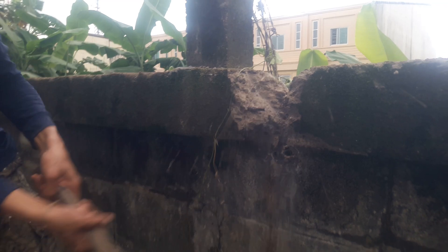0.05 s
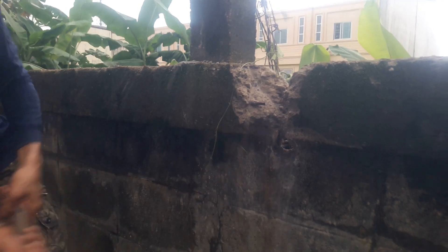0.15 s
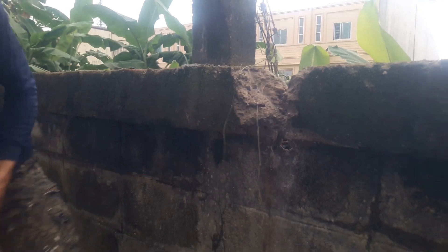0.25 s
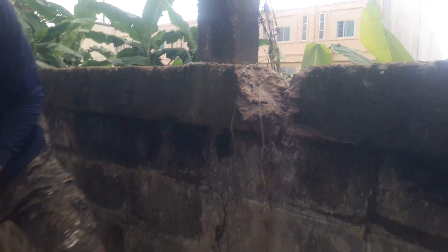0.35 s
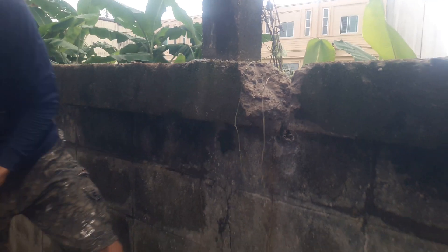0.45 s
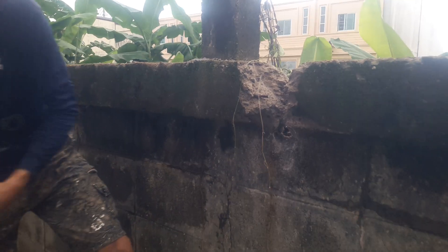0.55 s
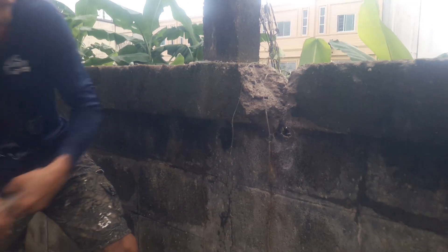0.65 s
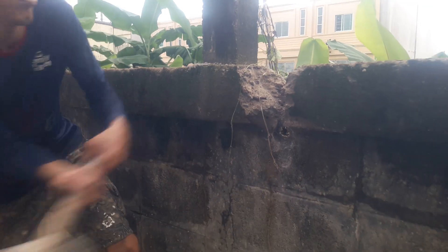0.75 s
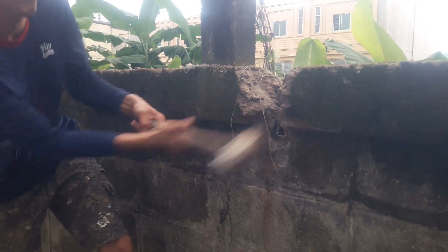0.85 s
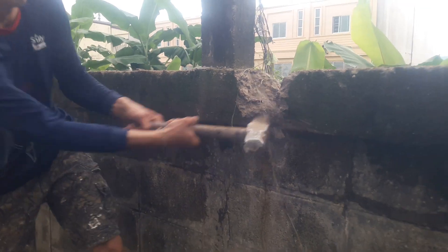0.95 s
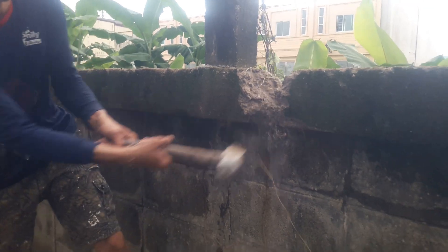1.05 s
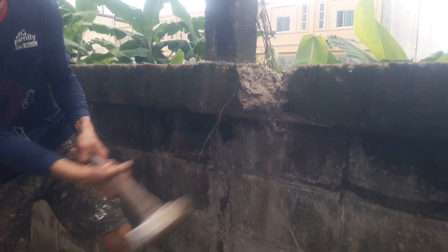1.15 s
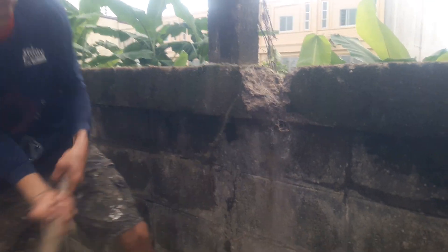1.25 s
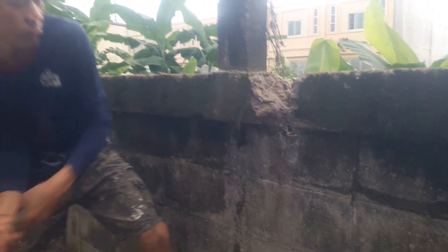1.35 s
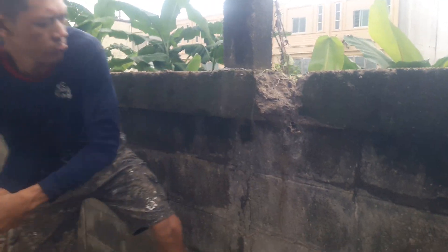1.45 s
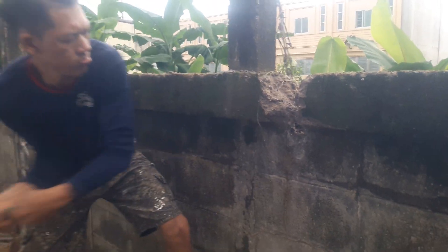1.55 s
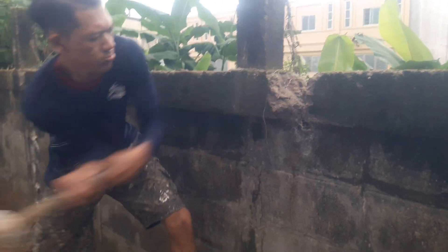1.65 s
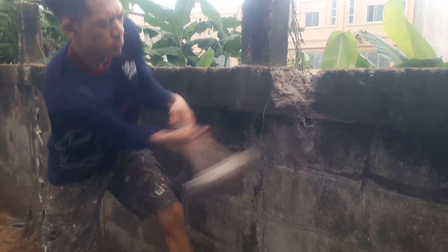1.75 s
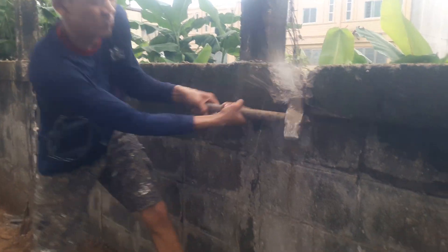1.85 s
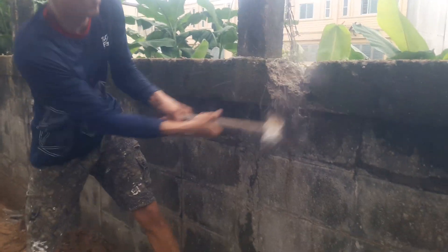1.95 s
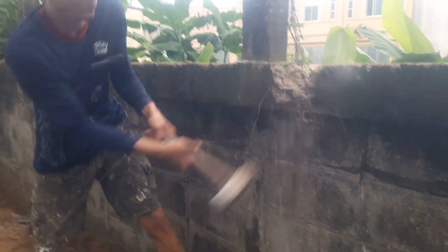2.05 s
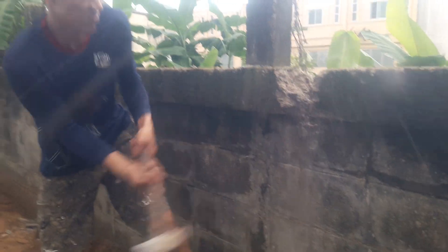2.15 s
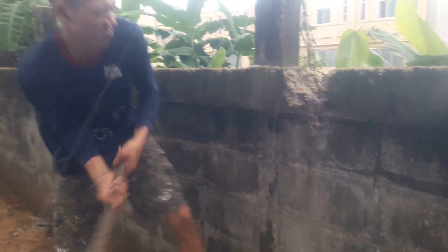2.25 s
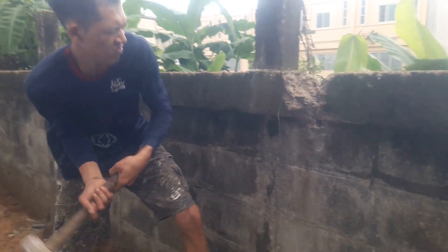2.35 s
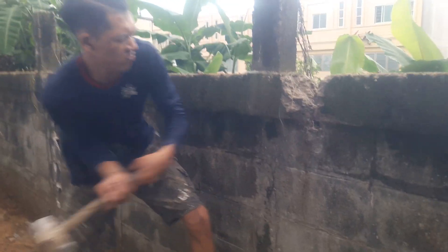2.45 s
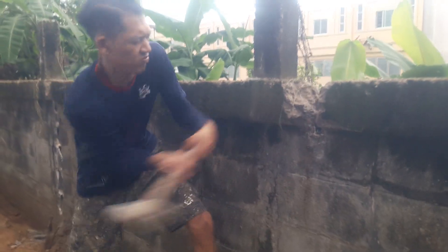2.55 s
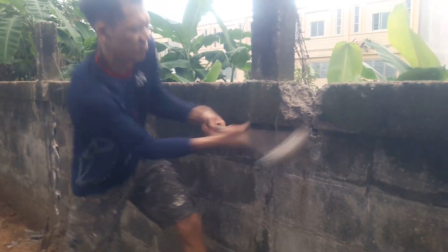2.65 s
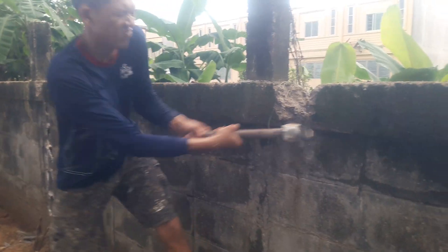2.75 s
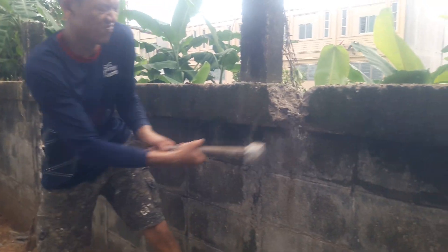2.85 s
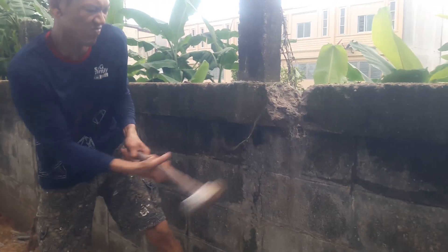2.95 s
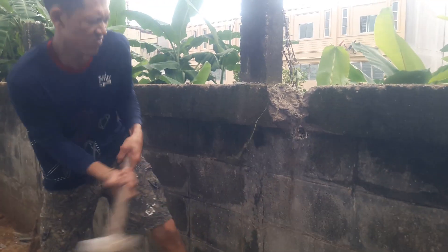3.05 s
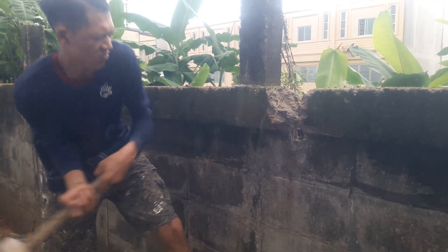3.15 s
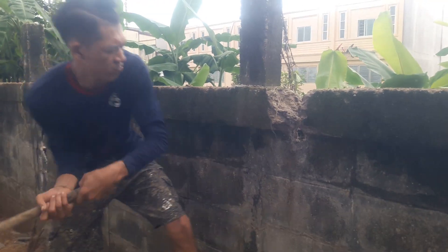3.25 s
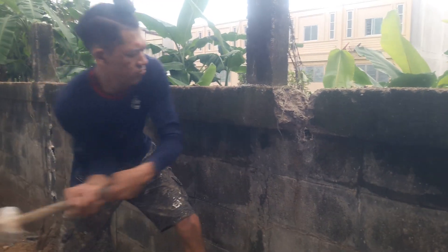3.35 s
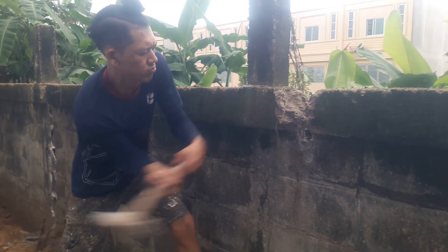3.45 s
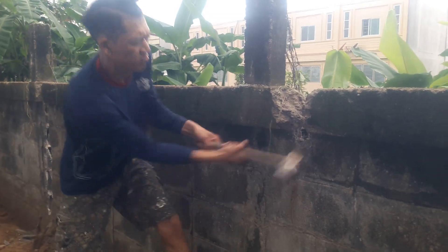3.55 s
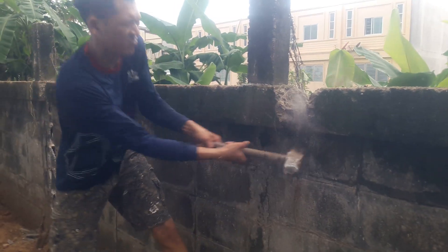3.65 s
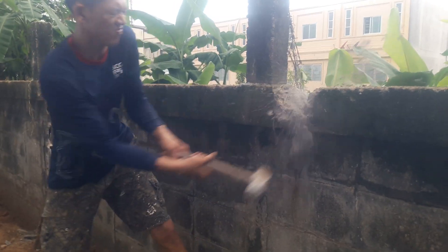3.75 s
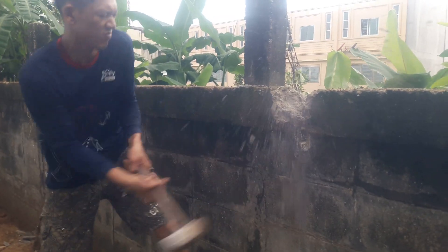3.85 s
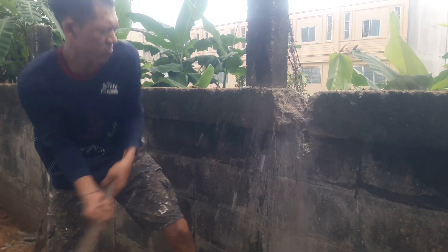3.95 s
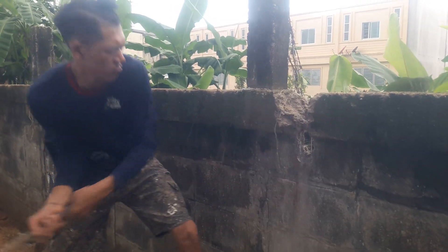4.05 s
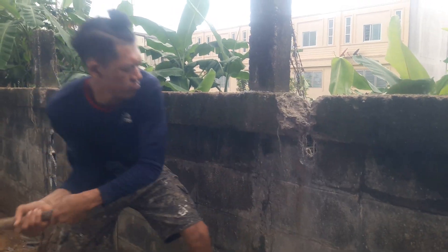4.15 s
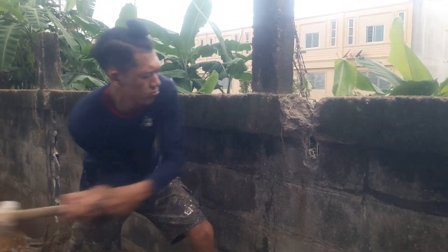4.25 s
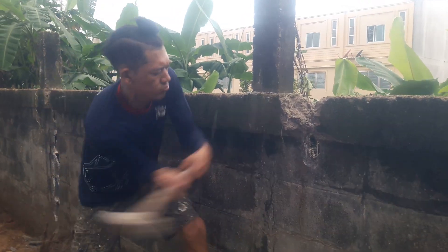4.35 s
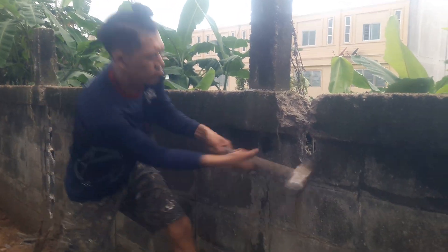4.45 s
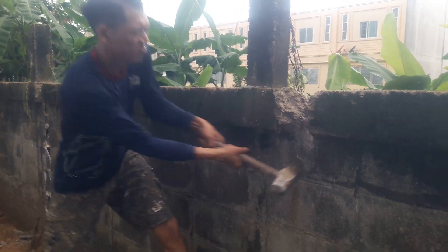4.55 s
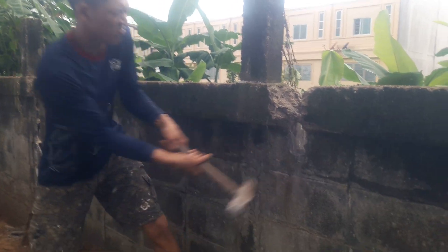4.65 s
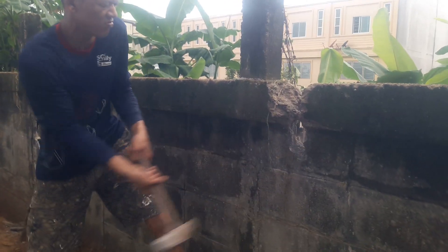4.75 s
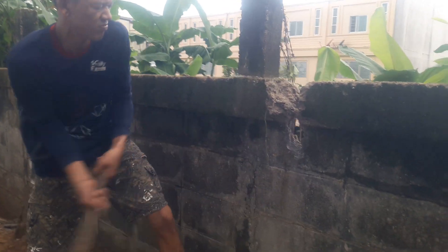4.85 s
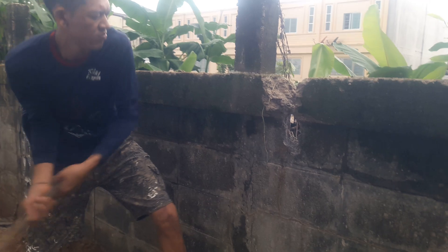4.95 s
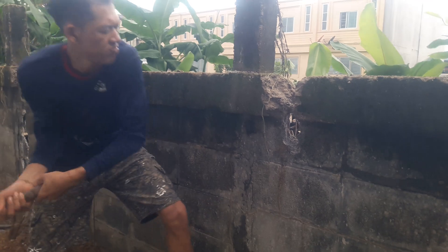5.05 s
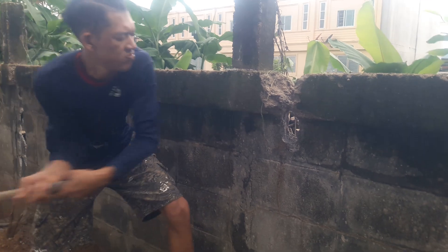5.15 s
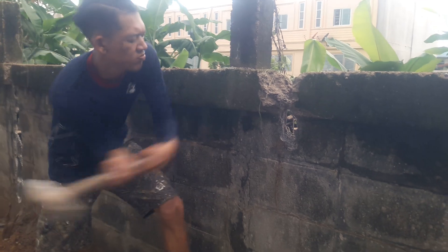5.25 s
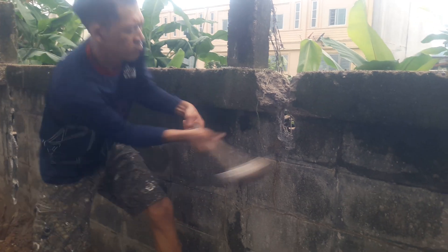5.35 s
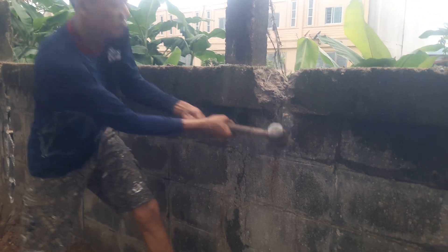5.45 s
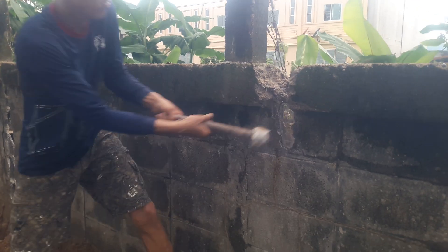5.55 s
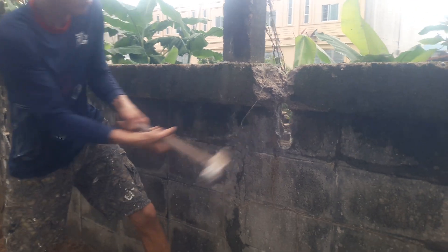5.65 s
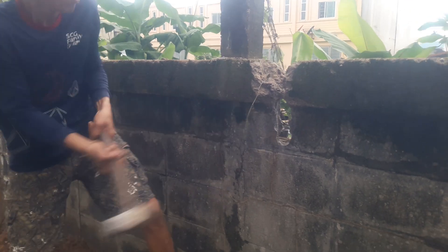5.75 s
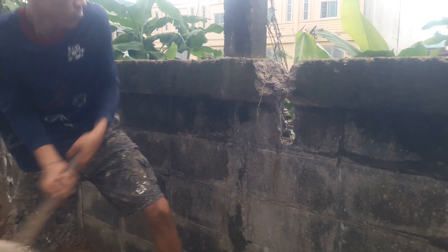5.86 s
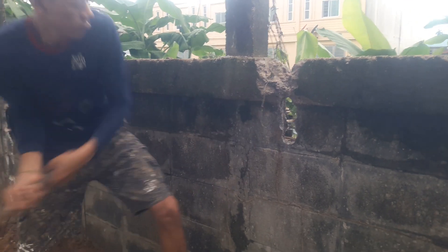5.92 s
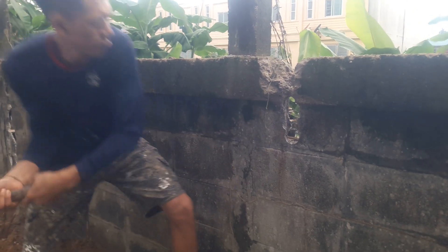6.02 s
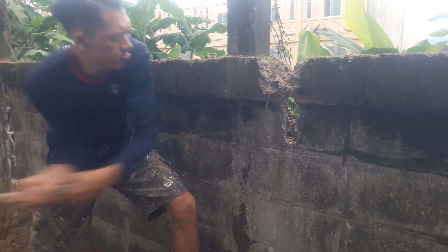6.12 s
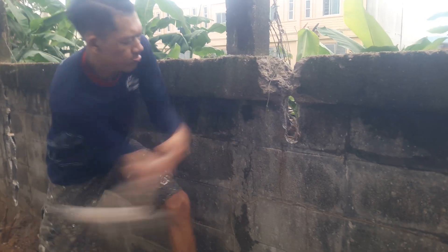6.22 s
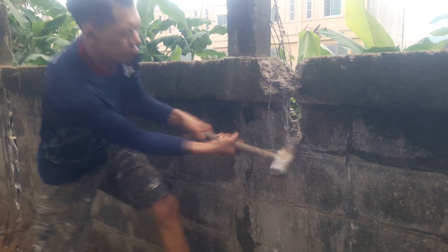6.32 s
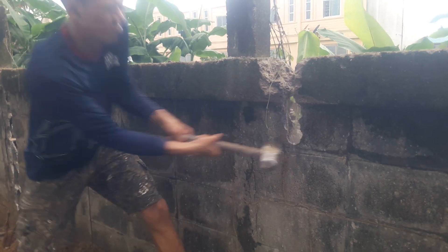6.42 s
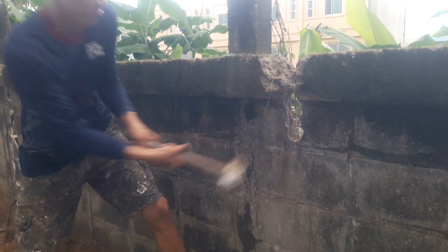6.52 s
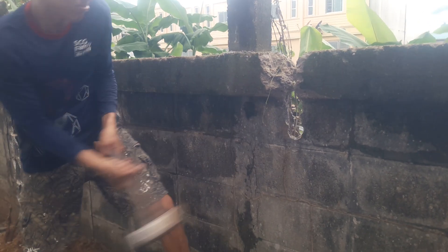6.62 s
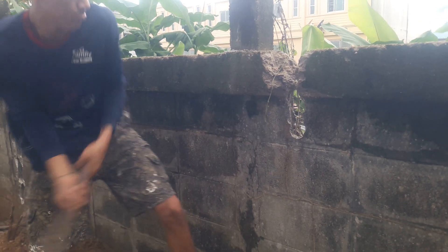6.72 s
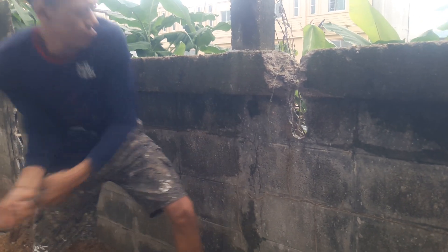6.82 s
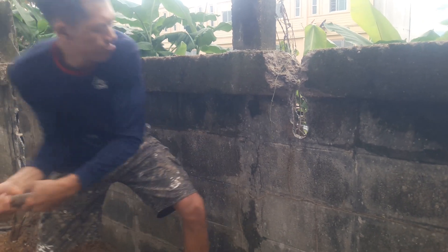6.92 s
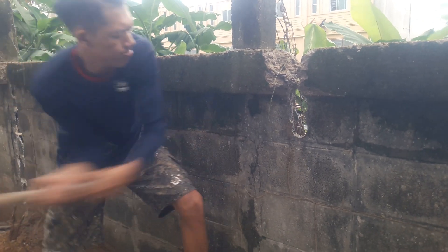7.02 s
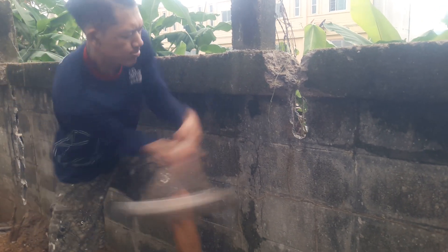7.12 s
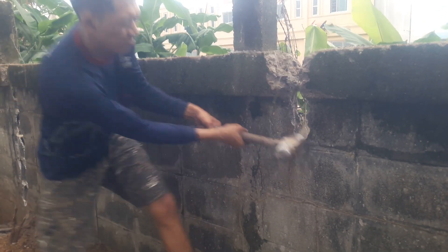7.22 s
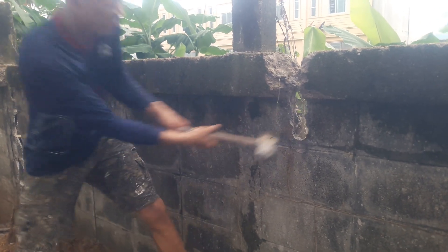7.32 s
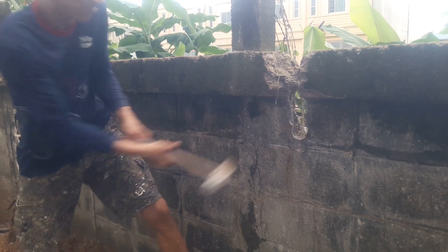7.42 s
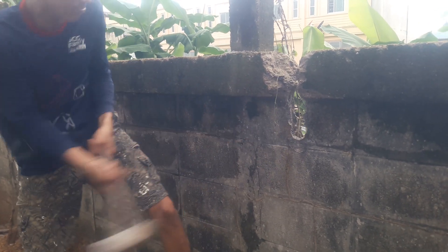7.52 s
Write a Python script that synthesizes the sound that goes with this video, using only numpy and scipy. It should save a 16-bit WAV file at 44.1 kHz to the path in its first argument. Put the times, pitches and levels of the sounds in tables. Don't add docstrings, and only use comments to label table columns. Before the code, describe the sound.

Outdoors in a narrow walled yard, a heavy steel hammer hits hollow concrete blocks eight times at a steady pace just under a second apart. Each blow is a hard knock with a thump, gritty crunch and faint steel ring, then quick wall slaps and a scattered tail. Chips clack, lumps thud and sand patters between blows. A distant motor drone fades behind. The microphone is close, thin in the bass, with flattened peaks.

```python
import sys
import numpy as np
from scipy import signal
from scipy.io import wavfile
from scipy.ndimage import uniform_filter1d

SR = 44100
rng = np.random.default_rng(int(sys.argv[2]) if len(sys.argv) > 2 else 0)


def to_linear_factor(level_db):
    exponent = np.asarray(level_db, float) / 20
    return 10 ** exponent


def int16_out(signal):
    q = np.round(np.clip(np.atleast_2d(signal).T, -1, 1) * 32767)
    wavfile.write(sys.argv[1], SR, q.astype(np.int16))


N = 334495
LEAD = SR // 5
TOTAL = N + LEAD


def clock():
    return (np.arange(TOTAL) - LEAD) / SR


def at_hz(points, hz, axis=1):
    return np.interp(np.log(hz), np.log(np.array(points)[:, 0]), np.array(points)[:, axis])


def rms_one(x):
    return x / np.sqrt(np.mean(x ** 2) + 1e-20)


def peak_one(x):
    return x / (np.max(np.abs(x)) + 1e-20)


def band(x, low_hz, high_hz):
    edges = [low_hz, min(high_hz, .45 * SR)]
    return signal.sosfilt(signal.butter(2, edges, "band", fs=SR, output="sos"), x)


def ring(clicks, hz, t60):
    r, w = to_linear_factor(-60 / (max(t60, .001) * SR)), 2 * np.pi * hz / SR
    return signal.lfilter([0, np.sin(w)], [1, -2 * r * np.cos(w), r * r], clicks + 1e-18)


def drift(rate):
    r = np.exp(-80 * np.pi * rate / SR)
    slow = signal.lfilter([1], [1, -2 * r, r * r], rng.standard_normal(TOTAL // 40 + 2002))[2000:]
    return np.interp(np.arange(TOTAL) / 40, np.arange(len(slow)), rms_one(slow))


def burst(size, decay_s, rise_s):
    t = np.arange(size) / SR
    clicks = rng.standard_normal(size) * to_linear_factor(7.0 * rng.exponential(1, size).clip(0, 4))
    return clicks * (1 - np.exp(-t / rise_s)) * np.exp(-t / decay_s)


def add(track, s, sound):
    at = LEAD + round(s * SR)
    track[at:at + len(sound)] += sound[:len(track) - at]


# time_s, level_db
MOTOR_LEVEL = [(0, -39.5), (.7, -42.5), (1.5, -51), (3.3, -44), (4.2, -50.5), (5.0, -53.5), (5.4, -59.5),
               (6.4, -56), (7.58, -67.5)]


def motor_level():
    s, db = np.transpose(MOTOR_LEVEL)
    return np.interp(clock(), s, db)


# pitch_hz, level_db
MOTOR_LINES = [(58, -22.5), (165, 1), (186, -1.5), (305, -1.5), (335, 8), (365, -9)]


def hum(drone_db):
    white = rng.standard_normal(TOTAL)
    lines = sum(to_linear_factor(db) * rms_one(ring(white, hz, 1.0)) for hz, db in MOTOR_LINES)
    return to_linear_factor(drone_db - 11) * rms_one(lines)


# start_s, pitch_hz, level_db, length_s
BIRD_NOTES = [(.865, 4800, -60, .06), (1.40, 4200, -68, .04), (3.34, 3600, -60, .05),
              (4.05, 5100, -62, .03), (6.938, 4800, -66, .05), (7.06, 2250, -68, .06)]


def peeps():
    out = np.zeros(TOTAL)
    for s, hz, db, length in BIRD_NOTES:
        t = np.arange(round(length * SR)) / SR
        swell = np.sqrt(np.sin(np.pi * t / length))
        add(out, s, to_linear_factor(db) * swell * np.sin(2 * np.pi * hz * t * (1 - 0.05 * t)))
    return out


# pitch_hz, level_db_per_hz, t60_s
YARD_TAIL = [(60, 4, 0.7), (160, -4, 0.48), (420, 0, 0.47), (1100, -1, 0.43), (2830, 1.5, 0.42),
             (7700, -2, 0.39), (15300, 12, 0.034)]
# pitch_hz, level_db_per_hz
DRONE_COLOUR = [(30, -4.5), (58, 26.5), (90, -10), (150, 21.5), (230, -5.5), (315, 8), (450, -10.5),
                (900, -51.5)]
# pitch_hz, level_db_per_hz
AIR_COLOUR = [(200, 20.5), (500, 16), (1000, 12.5), (2200, 2.5), (4000, -15.5), (9000, -88), (15000, -51)]


def octave_thirds():
    edges = 30 * 2 ** np.arange(0, 9.2, 1 / 3)
    return zip(edges, edges[1:], np.sqrt(edges[1:] * edges[:-1]))


def diffuse(struck, sand_db, tilt_db, drone_db, air_db):
    yard_db, build_up_s = -10, 0.0023
    late_db, late_stretch = -13.5, 2.2
    white, together, own = rng.standard_normal((2, TOTAL)), drift(3.9), drift(25.0)
    clumps = to_linear_factor(2 * 2.0 * drift(120.0))
    out, build = 0, np.exp(-1 / (build_up_s * SR))
    for k, (low, high, hz) in enumerate(octave_thirds()):
        fade = to_linear_factor(-120 / (at_hz(YARD_TAIL, hz, axis=2) * SR))
        energy = 0.46 * band(struck, low / 1.306, high * 1.317) ** 2 + 1e-18
        fed = signal.lfilter([(1 - build) / 441], [1, -build], energy)
        tail = signal.lfilter([1], [1, -fade], fed) * clumps
        tail += to_linear_factor(2 * late_db) * signal.lfilter([1], [1, -fade ** (1 / late_stretch)], fed)
        tail *= to_linear_factor(2 * (yard_db + at_hz(YARD_TAIL, hz)))

        flicker = 0.55 * together + np.roll(own, 9001 * k)
        sand_colour = at_hz(GRAIN_COLOUR, hz) + tilt_db * np.log2(hz / 6000)
        steady = to_linear_factor(2 * (sand_db + sand_colour - 42 + 3.3 * flicker))
        steady += to_linear_factor(2 * (drone_db + at_hz(DRONE_COLOUR, hz) - 37.5 + 1.1 * flicker))
        steady += to_linear_factor(2 * (air_db + at_hz(AIR_COLOUR, hz) - 39.0 + .8 * flicker))
        power = tail + steady * (high - low)
        out = out + np.sqrt(power) * rms_one(band(white[k % 2], low, high))
    return out


# start_s, length_s, level_db, pitch_hz
BOOT_SCUFFS = [(5.142, 0.066, -55, 1500), (5.714, 0.072, -49, 720), (6.242, 0.12, -54, 720),
               (3.11, 0.05, -52.5, 2400), (4.3, 0.024, -57, 2400)]


def scuffs():
    out, bumps = np.zeros(TOTAL), to_linear_factor(1.7 * drift(60.0))
    t = np.arange(SR // 3) / SR
    for s, length, db, hz in BOOT_SCUFFS:
        drag = rms_one(band(rng.standard_normal(len(t)), hz * .8, hz * 1.31))
        envelope = (1 - np.exp(-t / 0.0075)) * np.exp(-(t - length).clip(0) / .03)
        add(out, s, to_linear_factor(db) * drag * envelope)
    return out * bumps


# start_s, length_s, level_db, swell_db_per_s
SAND_SHOWERS = [(0, 0.8, -64.5, 9), (0.333, 0.55, -58, -20), (1.478, .45, -61.5, -26),
                (2.331, 0.028, -63.5, -2), (2.406, 0.51, -59.5, 4.5), (3.108, 0.021, -54, 0),
                (3.14, 0.42, -63, 6.5), (4.053, 0.047, -62, -12), (4.146, 0.26, -56.5, 21.5),
                (4.7, 0.56, -72.5, 11.5), (5.851, 0.29, -73.5, 13), (6.109, 0.2, -64.5, 11.5),
                (6.923, 0.2, -68.5, -45)]


def falling_sand():
    rise_s, fall_s = 0.0023, 0.13
    dust_db, dust_fall_s = -48, .04
    t = clock()
    power = to_linear_factor(2 * (-71 - 1.9 * t))
    for s, length, db, swell_db in SAND_SHOWERS:
        age = (t - s).clip(0)
        rise, fall = 1 - np.exp(-age / rise_s), np.exp(-(age - length).clip(0) / fall_s)
        power += rise * to_linear_factor(2 * (db + swell_db * age.clip(0, length))) * fall
    for s, *_ in EARLIER_BLOW + HAMMER_BLOWS:
        power += (t > s) * to_linear_factor(2 * dust_db) * np.exp(-(t - s).clip(0) / dust_fall_s)
    return 10 * np.log10(power)


# pitch_hz, level_db_per_hz
GRAIN_COLOUR = [(700, -12), (1300, -6), (2300, 6.5), (5000, 7), (9000, -1), (12000, 2.5), (15000, 1)]


def grit(grains_per_s, grit_db, tilt_db):
    sizes = to_linear_factor(5.0 * rng.exponential(1, TOTAL).clip(0, 3.2)) * rng.choice([-1, 1], TOTAL)
    born = rng.random(TOTAL) < grains_per_s * to_linear_factor(5.0 * drift(40.0)) / SR
    pitches, dealt = np.geomspace(2200, 14000, 10), rng.integers(0, 10, TOTAL)
    grains = np.zeros(TOTAL)
    for k, hz in enumerate(pitches):
        colour_db = at_hz(GRAIN_COLOUR, hz) + tilt_db * np.log2(hz / 6000)
        grains += to_linear_factor(colour_db) * ring(sizes * born * (dealt == k), hz, 4.0 / hz)
    evened = grains / np.sqrt(uniform_filter1d(grains ** 2, size=SR // 4) + 1e-12)
    return to_linear_factor(grit_db + 0.5) * evened


# start_s, peak_db, pitch_hz, tick_db
CHIP_LANDINGS = [(0.025, -24.5, 910, 2), (0.148, -27, 1870, -11), (0.232, -22.5, 1800, -18),
                 (0.361, -11, 1760, -5.5), (0.524, -21.5, 2500, -5.5), (0.589, -41, 2150, 2),
                 (0.667, -51, 1685, -6), (0.829, -28.5, 2490, -11), (0.912, -40.5, 902, -14),
                 (1.249, -29, 1860, -18), (1.334, -28, 1570, -42), (1.574, -37, 1040, -18),
                 (1.6, -38, 1870, -10), (2.41, -13, 1910, -20), (2.522, -33, 2110, -11),
                 (2.567, -41, 1870, 1), (2.624, -32.5, 2570, -2), (2.668, -20.5, 2270, -6.5),
                 (2.709, -16.5, 1440, -4.5), (3.18, -14, 1150, -6.5), (3.328, -21.5, 1750, -31),
                 (3.53, -31, 2440, -10), (4.082, -22.5, 1920, -33), (4.157, -32, 2460, -4),
                 (4.192, -30, 2470, 2), (4.3, -30.5, 1210, -3), (4.339, -31, 2330, 3),
                 (4.509, -32, 1000, -18), (4.934, -23, 1920, -43), (5.14, -29.5, 1150, -14)]
# start_s, peak_db, pitch_hz, tick_db
HEAD_GRAZES = [(1.882, -46, 1000, -20), (3.6395, -29, 1300, -22), (5.460, -35, 1500, -8)]


def chips():
    out = np.zeros(TOTAL)
    for s, peak_db, hz, tick_db in CHIP_LANDINGS + HEAD_GRAZES:
        touch = burst(size=SR // 12, decay_s=0.0027, rise_s=0.0003)
        clack = peak_one(band(touch, hz * 0.41, hz * 1.73))
        clack += 0.54 * peak_one(ring(touch, hz, t60=0.0067))
        body, tick = band(touch, 300, 1000), band(touch, 2300, 9200)
        chip = peak_one(clack) + to_linear_factor(-19) * peak_one(body) + to_linear_factor(tick_db + 0.5) * peak_one(tick)
        add(out, s, to_linear_factor(peak_db) * chip)
    return out


# start_s, peak_db
SPLINTER_TICKS = [(0.4174, -30), (0.4695, -27.5), (0.732, -35.5), (0.7608, -30.5), (1.2915, -48.5),
                  (1.4825, -44), (1.5225, -40.5), (1.834, -49), (2.2413, -49), (2.3291, -51), (2.9307, -35),
                  (3.0091, -34), (3.3916, -30), (4.0687, -39), (4.223, -30), (4.2547, -36), (4.3644, -30.5),
                  (4.3825, -39), (5.0858, -46), (5.3006, -43.5), (6.938, -42), (7.1788, -54), (7.2125, -52)]


def specks():
    out = np.zeros(TOTAL)
    for s, peak_db in SPLINTER_TICKS:
        tick = band(burst(size=SR // 12, decay_s=0.0026, rise_s=0.0003), 2900, 11000)
        add(out, s, to_linear_factor(peak_db) * peak_one(tick))
    return out


# start_s, peak_db, pitch_hz
LUMP_THUDS = [(2.4105, -21, 660), (3.181, -21, 660), (4.401, -31.5, 328), (5.068, -33.5, 102),
              (5.143, -36.5, 234), (5.226, -38, 96.9), (6.908, -38.5, 118)]


def thuds():
    out = np.zeros(TOTAL)
    for s, peak_db, hz in LUMP_THUDS:
        touch = band(burst(size=SR // 12, decay_s=0.00067, rise_s=0.0023), 50, 450 + hz)
        add(out, s, to_linear_factor(peak_db) * peak_one(ring(touch, hz, 0.018 + 3.1 / hz)))
    return out


# delay_s, level_db, smear_s
WALL_ECHOES = [(.0085, -26, .002), (0.0259, -7, .002), (.0335, -13.5, 0.0038), (.040, -11, 0.0037),
               (.0478, -8, .002), (0.061, -14, .005), (.074, -19, .006)]


def echoes(x):
    early, n = np.zeros(SR // 6), np.arange(SR // 30)
    for delay, db, smear in WALL_ECHOES:
        patch = .7 * rng.standard_normal(len(n)) * np.exp(-n / (smear * SR)) / np.sqrt(smear * SR)
        patch[0] = .9
        at = round(delay * SR)
        early[at:at + len(patch)] += to_linear_factor(db) * patch
    walls = band(early, 970, 11000) + to_linear_factor(-8.5) * band(early, 3600, 7500)
    return signal.fftconvolve(x, walls)[:TOTAL]


# start_s, peak_db
FACE_SPLITS = [(6.3983, -8), (6.4010, -4), (7.2715, -14), (7.2755, -11)]


def splits():
    out = np.zeros(TOTAL)
    for s, db in FACE_SPLITS:
        snap = band(burst(size=SR // 3, decay_s=.0006, rise_s=.0002), 3500, 17000)
        add(out, s, to_linear_factor(db) * peak_one(snap))
    return out


# start_s, knock_db, thump_db, crunch_db, snap_db
HAMMER_BLOWS = [
    (0.965, 0.5, -20, -20, -21),
    (1.892, -2.5, -19, -25, -29),
    (2.758, 1.5, -17.5, -21.5, -22),
    (3.651, -2.5, -14.5, -20.5, -21),
    (4.549, -7, -18.5, -12, -15),
    (5.474, -7.5, -19, -20, -14.5),
    (6.397, 3, -15, -14.5, -20.5),
    (7.272, 0, -17.5, -19, -24.5),
]
# start_s, knock_db, thump_db, crunch_db, snap_db
EARLIER_BLOW = [(-0.065, -10, -15, -21.5, -14)]
STEEL_RING_DB = [-52, -56, -45, -44, -58, -58, -60, -52, -60]
# pitch_hz, level_db, t60_s
BLOCK_MODES = [(170, -9, 0.092), (187, -2.5, 0.058), (229.8, -7.5, 0.14), (332, 1, 0.039), (402, -2, 0.05),
               (506, -2, 0.044), (554, -8, 0.052), (664, -1, 0.02), (687, -19.5, 0.048), (705, -10, 0.013),
               (755, 8, 0.013), (1025, 8, 0.004)]
# pitch_hz, level_db, t60_s
HEAD_MODES = [(9066, -5, .16), (13024, 5, .3), (8514, -11, .1)]


def block_modes(push):
    modes = []
    for hz, db, t60 in BLOCK_MODES:
        level = to_linear_factor(db + rng.normal(0, 1.8))
        late_push = np.roll(push, rng.integers(0, 90))
        modes.append(level * ring(late_push, hz * rng.normal(1, 0.044), t60))
    return modes


def blows():
    out, size = np.zeros(TOTAL), SR // 3
    strikes = zip(EARLIER_BLOW + HAMMER_BLOWS, STEEL_RING_DB)
    for (s, knock_db, thump_db, crunch_db, snap_db), steel_db in strikes:
        push = np.exp(-((np.arange(size) / SR - .0006) / 0.00021) ** 2)
        push += 0.52 * np.roll(push, rng.integers(180, 500))
        modes = block_modes(push)
        thump, knock = band(sum(modes[:4]), 140, 400), band(sum(modes[4:]), 220, 2800)
        crunch = band(burst(size=size, decay_s=0.0054, rise_s=0.0025), 920, 2660)

        split = peak_one(burst(size=size, decay_s=0.0015, rise_s=0.00071))
        split += to_linear_factor(-28) * peak_one(burst(size=size, decay_s=0.005, rise_s=.002))
        snap, crack = band(split, 2900, 7200), band(split, 9100, 18000)
        crack_db = 0.36 * (snap_db + 20.5) - 8.5 - 2.0 * s

        click = np.eye(1, size)[0]
        steel = to_linear_factor(steel_db) * sum(to_linear_factor(db) * ring(click, hz, t60) for hz, db, t60 in HEAD_MODES)
        low = to_linear_factor(thump_db + 8.5) * peak_one(thump) + to_linear_factor(knock_db - 1) * peak_one(knock)
        low += to_linear_factor(crunch_db + 9.5) * peak_one(crunch)
        high = to_linear_factor(snap_db + 9.0) * peak_one(snap) + to_linear_factor(crack_db) * peak_one(crack)
        add(out, s, low + high + steel)
    return out


def scene():
    grit_db, drone_db = falling_sand(), motor_level()
    air_db = -64 + .6 * (drone_db + 49.5)
    tilt_db = -1 + 0.15 * (grit_db + 59.5)
    hammer, snaps = blows(), splits()
    fallen = chips() + specks() + thuds()
    chip_send_db = -7.5
    field = diffuse(hammer + to_linear_factor(chip_send_db) * fallen, grit_db, tilt_db, drone_db, air_db)
    field += grit(1000, grit_db, tilt_db) + hum(drone_db) + peeps() + scuffs()
    slaps = echoes(hammer + to_linear_factor(-8) * snaps + to_linear_factor(chip_send_db - 5.5) * fallen)
    return (hammer + snaps + fallen + slaps + field)[None, LEAD:]


def low_pass(x):
    return signal.sosfilt(signal.butter(12, 17130, fs=SR, output="sos"), x)


# pitch_hz, width_hz, gain_db
MIC_PORT = [(2090, 1720, 4.5), (3720, 1590, -9), (5270, 2100, 4), (7960, 2700, -3), (8800, 1400, 9)]


def record(dry):
    x = signal.sosfilt(signal.butter(2, 110, "high", fs=SR, output="sos"), dry)
    x = signal.sosfilt(signal.cheby2(10, 50, 16400, fs=SR, output="sos"), x)
    for hz, width_hz, db in MIC_PORT:
        w, g = 2 * np.pi * hz / SR, to_linear_factor(db / 2)
        q = np.sin(w) * width_hz / hz / 2
        boost, cut = [1 + q * g, -2 * np.cos(w), 1 - q * g], [1 + q / g, -2 * np.cos(w), 1 - q / g]
        x = signal.lfilter(boost, cut, x)
    ceiling = .95
    mix = x / (1 + (x / ceiling) ** 4) ** (1 / 4)
    return low_pass(mix)


dry = scene()
out = record(dry)
int16_out(out)
```